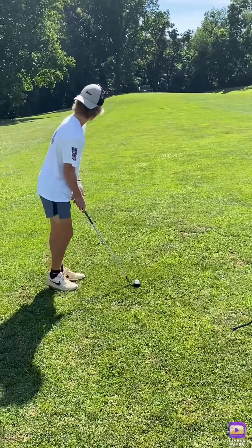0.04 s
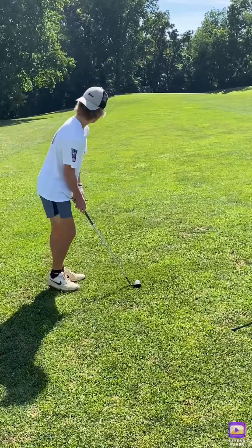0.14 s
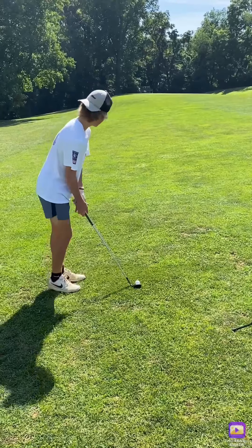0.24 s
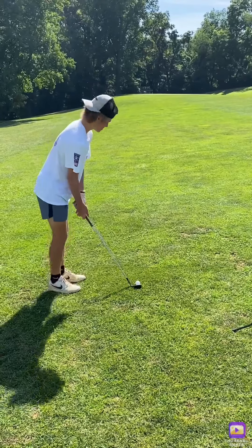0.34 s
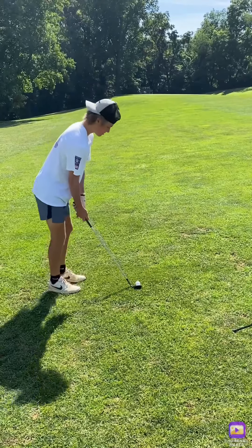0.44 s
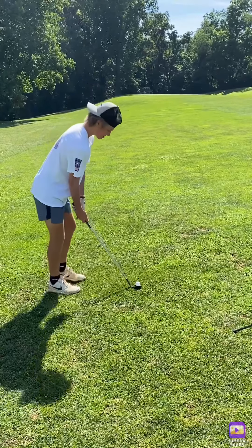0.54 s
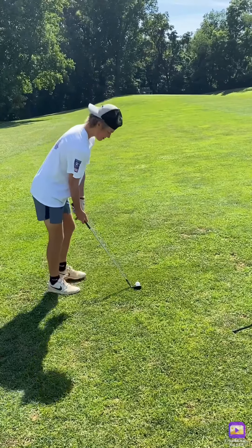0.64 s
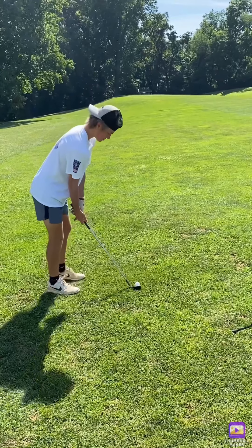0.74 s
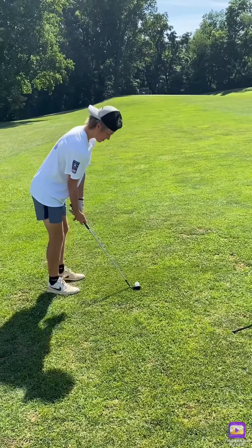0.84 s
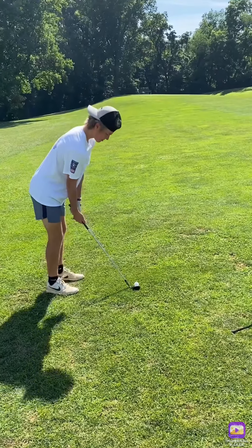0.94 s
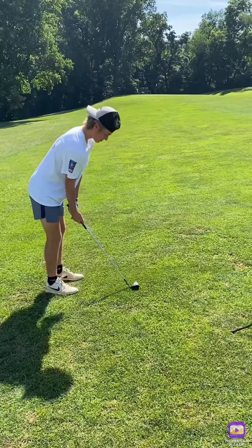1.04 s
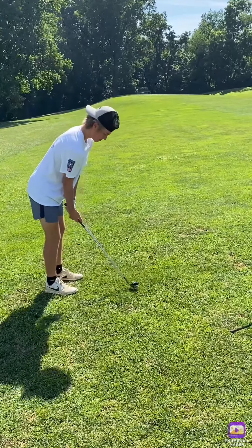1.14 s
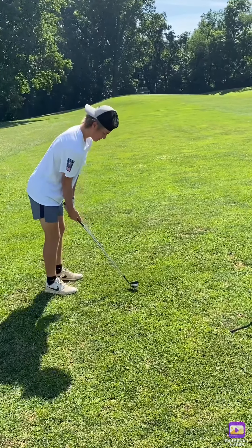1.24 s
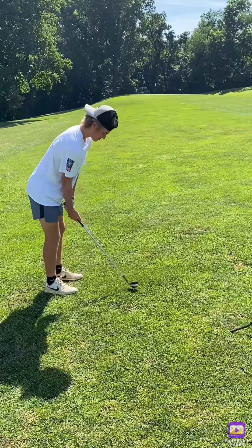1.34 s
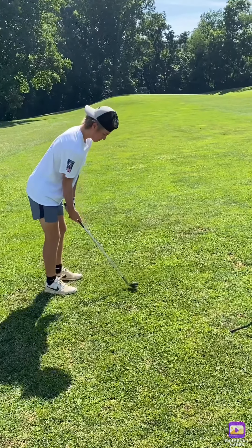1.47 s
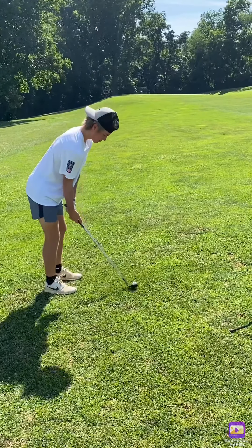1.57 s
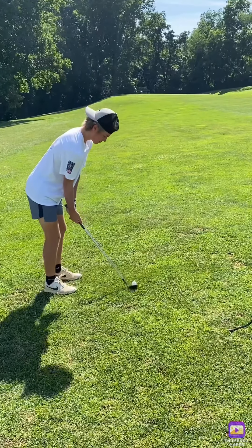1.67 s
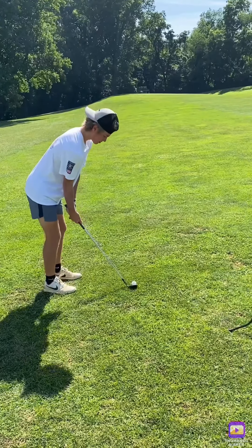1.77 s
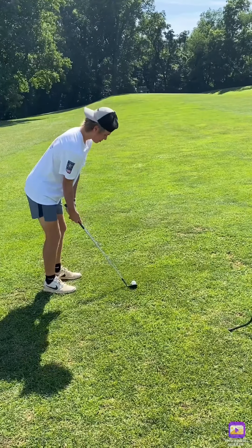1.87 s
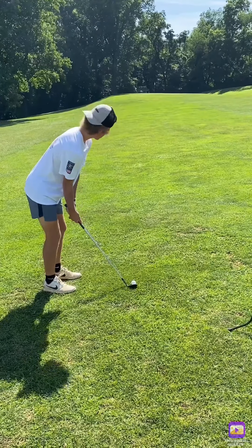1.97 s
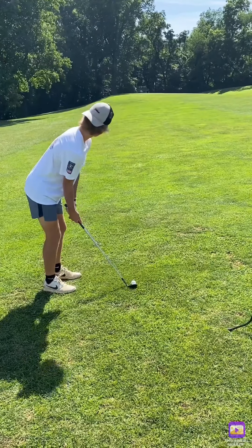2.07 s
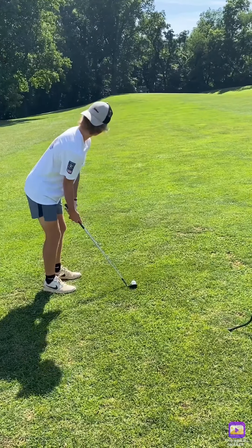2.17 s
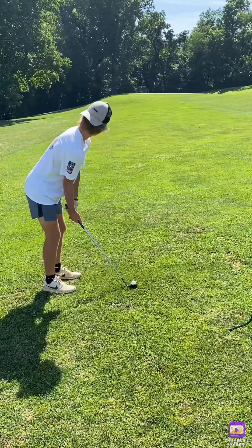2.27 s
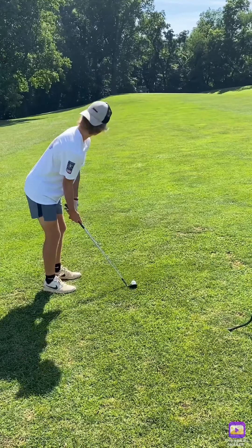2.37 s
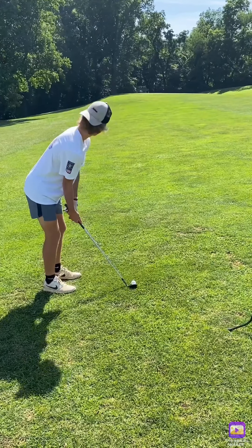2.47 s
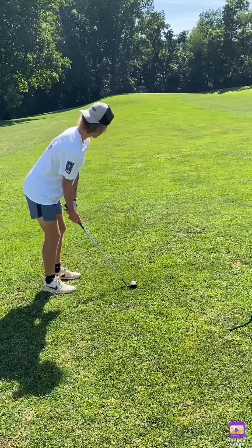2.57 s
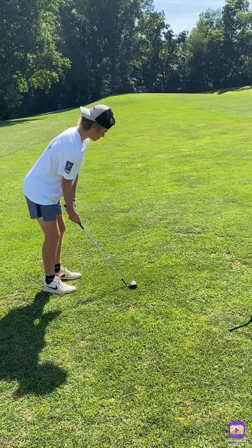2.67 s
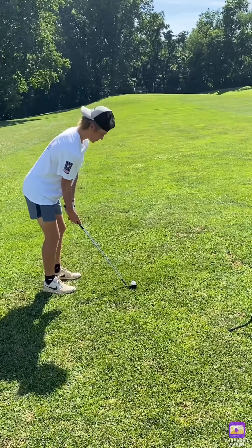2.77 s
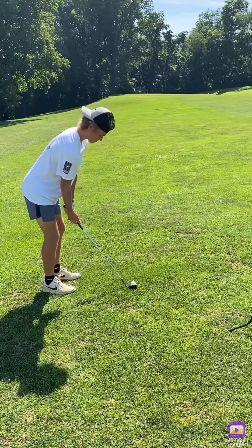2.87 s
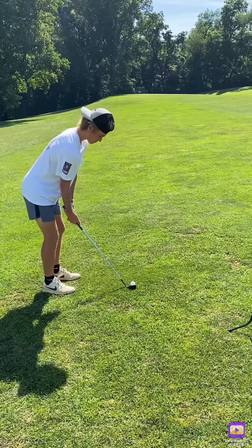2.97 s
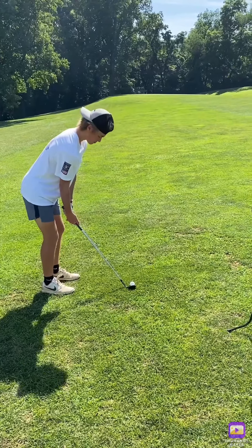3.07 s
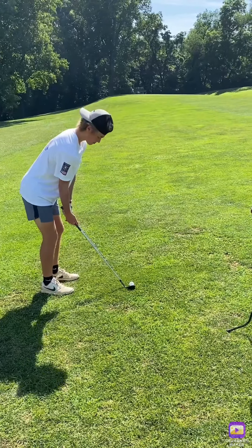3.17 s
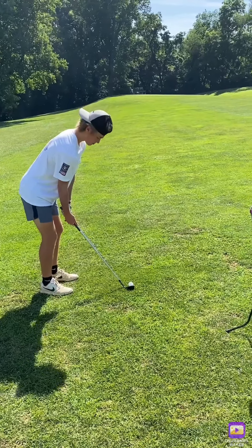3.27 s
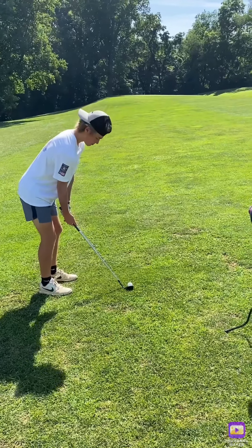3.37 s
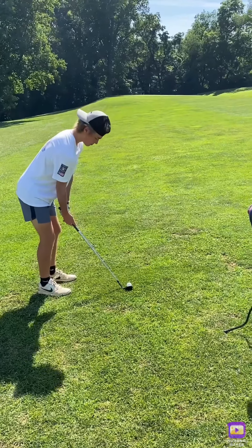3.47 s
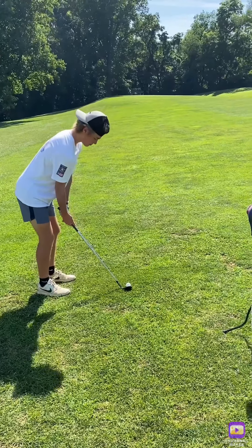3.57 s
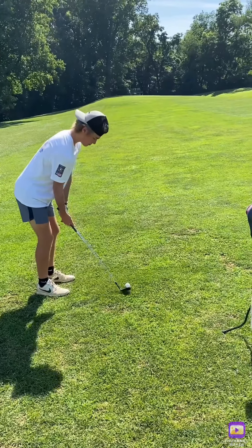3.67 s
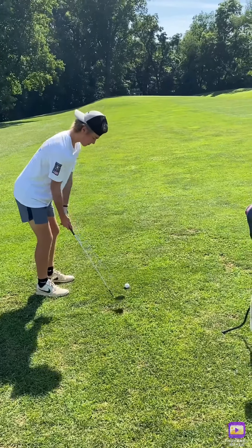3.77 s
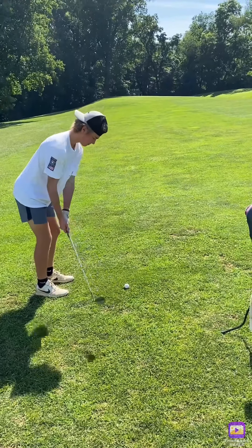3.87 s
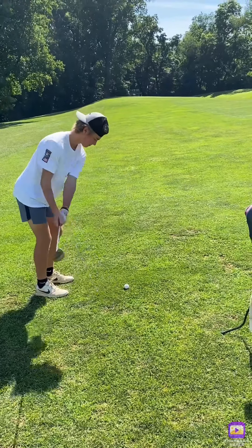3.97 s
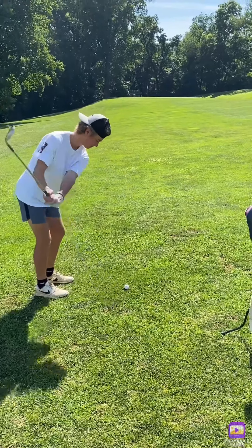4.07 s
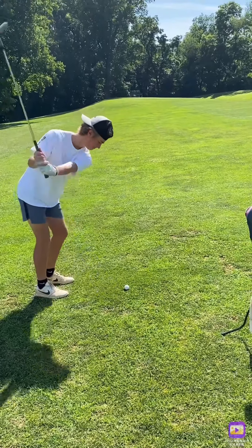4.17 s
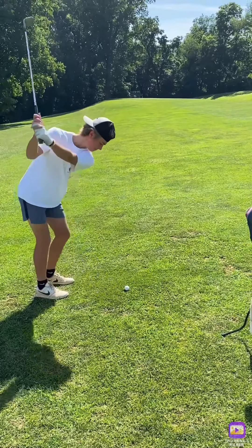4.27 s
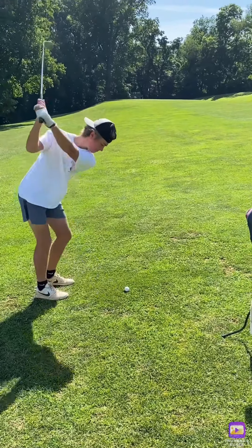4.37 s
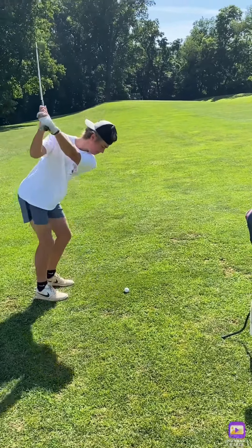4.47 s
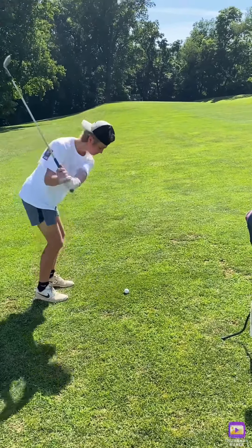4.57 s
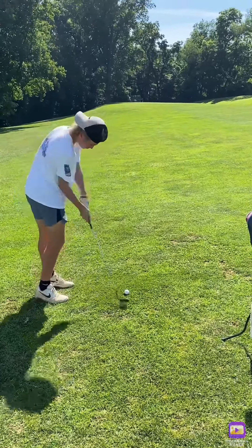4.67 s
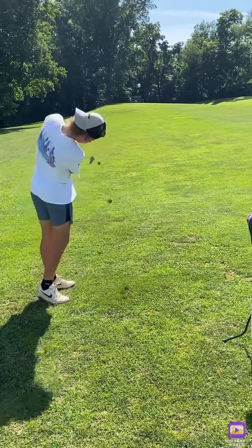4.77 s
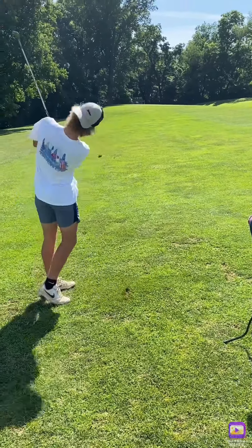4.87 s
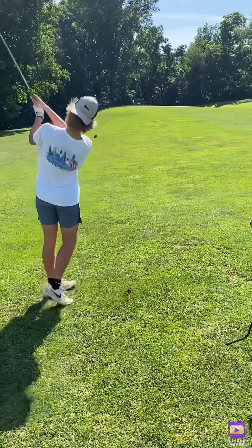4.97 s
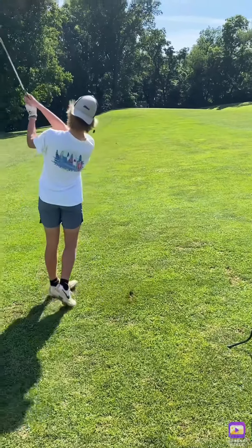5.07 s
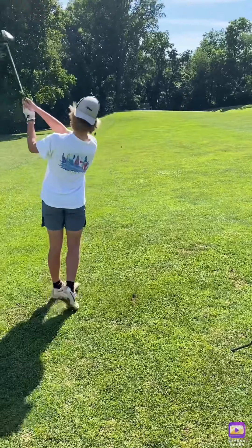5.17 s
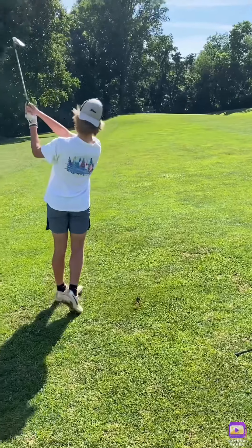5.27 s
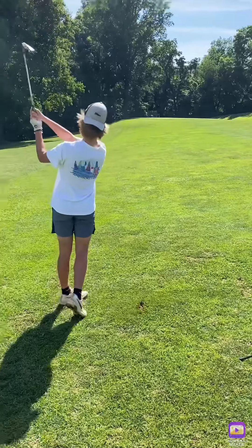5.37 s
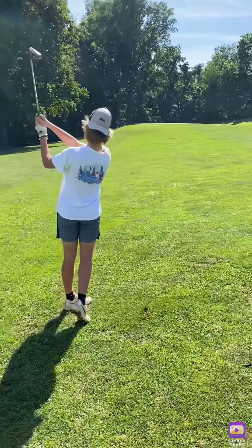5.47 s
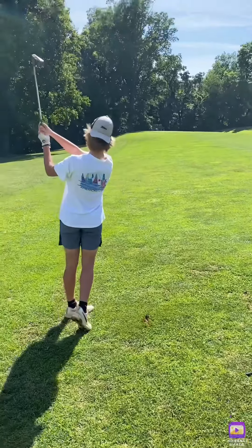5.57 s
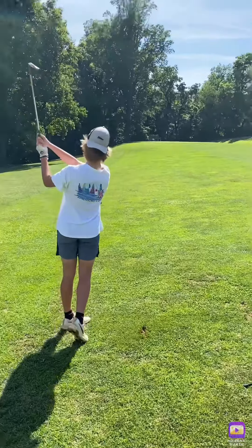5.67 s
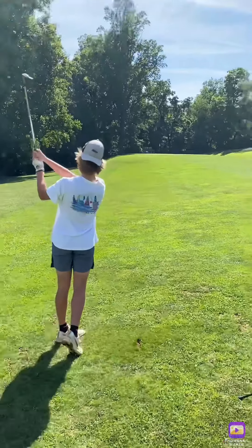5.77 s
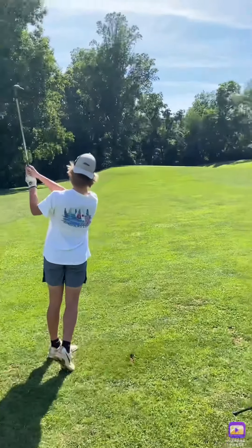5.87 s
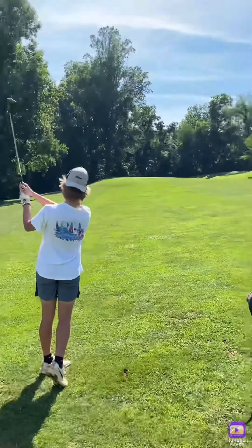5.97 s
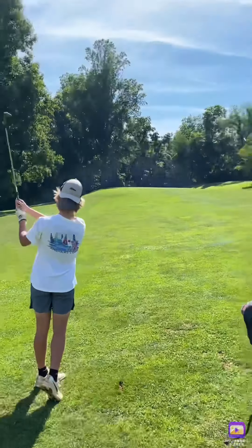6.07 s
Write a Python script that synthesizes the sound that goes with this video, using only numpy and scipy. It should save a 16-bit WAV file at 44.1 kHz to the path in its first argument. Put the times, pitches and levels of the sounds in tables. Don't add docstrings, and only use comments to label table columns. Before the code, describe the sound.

Low outdoor traffic rumble and engine drone continue steadily until one sharp, dry golf shot clicks close by, followed by a small patter of turf.

```python
import sys
import numpy as np
from scipy import signal
from scipy.fft import rfft, irfft, next_fast_len
from scipy.io import wavfile
from scipy.ndimage import uniform_filter1d, map_coordinates

SR = 44100
rng = np.random.default_rng(int(sys.argv[2]) if len(sys.argv) > 2 else 0)


def amplitude_ratio(level_db):
    exponent = np.asarray(level_db, float) / 20
    return 10 ** exponent


def persist_wave(psi):
    counts = np.round(np.clip(psi, -1, 1) * 32767).astype(np.int16)
    wavfile.write(sys.argv[1], SR, np.atleast_2d(counts).T)


N = 270485


def unit(x):
    return x / np.sqrt(np.mean(x ** 2) + 1e-20)


def along(points, hz):
    f, v = np.transpose(points)
    return np.interp(np.log(hz + 1), np.log(f + 1), v)


def curve(rows):
    s, value = np.transpose(rows)
    return np.interp(np.arange(N) / SR, s, value)


def burst(rows):
    s, db = np.transpose(rows)
    return amplitude_ratio(np.interp(np.arange(N) / SR, s, db, left=-200, right=-200))


def swell(s, db, rise_s, fall_s, hold_s=0):
    t = np.arange(N) / SR - s
    below = np.maximum(-t / rise_s, (t - hold_s) / fall_s)
    return amplitude_ratio(db - 20 * np.clip(below, 0, 10))


def passing(s, db, approach_s):
    t = np.arange(N) / SR - s
    leave_s = 2.5 * approach_s
    return db - 10 * np.log10(1 + (t / np.where(t < 0, approach_s, leave_s)) ** 2)


def wobble(rate_hz):
    knots = rng.standard_normal(int(N * rate_hz / SR) + 4)
    steps = np.arange(16 * len(knots)) / 16
    smooth = map_coordinates(knots, [steps])
    return np.interp(np.arange(N) * rate_hz / SR, steps, smooth)


def filtered(x, response):
    m = next_fast_len(N + SR // 4)
    spectrum = rfft(x, m) * response(np.fft.rfftfreq(m, 1 / SR))
    return irfft(spectrum, m)[..., :N]


def rush(spectrum, alike, patchy_db=0, grit_db=0):
    white = rng.standard_normal((2, N)) * amplitude_ratio(grit_db * wobble(340))
    z = signal.stft(white, nperseg=512)[2]
    field = rng.standard_normal(z.shape[1:])
    field = uniform_filter1d(uniform_filter1d(field, 6, 0), 14, 1)
    pair = signal.istft(z * amplitude_ratio(patchy_db * unit(field)), nperseg=512)[1][:, :N]

    def mid_side(hz):
        turn = np.arccos(np.clip(along(alike, hz), -1, 1)) / 2
        return amplitude_ratio(along(spectrum, hz)) * [np.cos(turn), np.sin(turn)]

    mid, side = filtered(pair, mid_side)
    return unit(np.array([mid + side, mid - side]))


def tone(hz, db, flutter_db):
    phase = 2 * np.pi * (np.cumsum(hz) / SR + rng.random()) + .15 * wobble(3)
    level = amplitude_ratio(db + flutter_db * wobble(2.5))
    return np.sqrt(2) * level * np.sin(phase)


# (frequency [Hz], likeness [0-1])
FAR_LIKENESS = [(60, 0.98), (250, 0.96), (600, 0.89), (1500, 0.91), (2500, .78), (4300, 0.47), (6000, 1),
                (9000, .93), (15000, 0.52)]
# (time [s], level [dB])
TRAFFIC_LEVEL = [(0, -34.5), (.84, -37.5), (1.14, -40.5), (2.82, -38), (3.64, -33.5), (4.54, -36),
                 (5.4, -34.5), (6.13, -45)]
# (frequency [Hz], density [dB per Hz])
RUMBLE_SPECTRUM = [(20, -50), (32, -3), (45, -2.5), (70, 10), (110, 4.5), (156, 3), (200, -3.5), (240, -10),
                   (300, -11.5), (450, -48.5), (900, -120)]


def rumble():
    level = amplitude_ratio(curve(TRAFFIC_LEVEL) - 3.5 + 0.57 * wobble(3.01))
    return level * rush(RUMBLE_SPECTRUM, FAR_LIKENESS, patchy_db=1.3)


# (time [s], level [dB])
RECEDE_LEVEL = [(0, 0), (1.5, 0), (3, -1.5), (3.7, -3), (5.4, -3), (6.13, -3)]
# (frequency [Hz], density [dB per Hz])
ROAR_SPECTRUM = [(165, -32), (330, -9.5), (480, -3.5), (640, -5.5), (850, 1.5), (1150, -5.5), (1700, -10),
                 (2400, -14.5), (3300, -23), (4600, -32.5), (6500, -40), (8500, -57), (12800, -61.5),
                 (14000, -78.5)]


def tyre_roar():
    level = amplitude_ratio(-44 + 0.34 * curve(RECEDE_LEVEL) + 0.5 * wobble(6))
    return level * rush(ROAR_SPECTRUM, FAR_LIKENESS, patchy_db=0.78)


# (nearest [s], level [dB], approach [s])
CAR_PASSES = [
    (3.65, -53, .2),
    (4.9, -50.5, .3),
]
# (frequency [Hz], density [dB per Hz])
CAR_SPECTRUM = [(200, -120), (290, -31), (370, -6), (430, -1.5), (520, -1.5), (650, -30.5), (1000, -120)]


def car_hum():
    level = sum(amplitude_ratio(passing(*row) - 4.5) for row in CAR_PASSES)
    return level * rush(CAR_SPECTRUM, FAR_LIKENESS, patchy_db=1.5)


# (nearest [s], pitch [Hz], slide [Hz per s], level [dB rms], approach [s])
EXHAUST_NOTES = [
    (2.1, 82.6, -1.8, -39, 0.4),
    (5.4, 56.9, 0.93, -44, 1.3),
    (4.6, 53.8, .5, -42.5, 1.3),
    (5.66, 387, 25, -52.5, .03),
]


def exhausts():
    t = np.arange(N) / SR
    return sum(tone(hz + slide * (t - s), passing(s, db, approach_s), flutter_db=2.0)
               for s, hz, slide, db, approach_s in EXHAUST_NOTES)


# (shaft [Hz], drift [Hz per s], level [dB], share of receding [ratio])
MOWER_ENGINES = [
    (20.264, 0.0251, 1, .9),
    (21.37, .003, -1.5, 1.5),
]
# (multiple of shaft [ratio], level [dB rms])
FIRST_ORDERS = [(4, -54), (5, -47), (6, -52.5), (7, -45.5), (8, -65), (9, -46.5), (10, -52), (11, -54.5),
                (12, -55), (13, -60.5), (14, -58), (16, -63.5), (19, -69.5), (21, -63.5)]
SECOND_ORDERS = [(2, -53.5), (4, -47), (5, -48), (6, -56.5), (7, -40.5), (8, -54), (9, -46), (10, -60.5),
                 (12, -62), (13, -63), (14, -62.5)]


def mower(engine, orders):
    shaft_hz, drift, db, share = engine
    hz = shaft_hz + drift * np.arange(N) / SR
    db = db + share * curve(RECEDE_LEVEL)
    return sum(tone(k * hz, db + order_db, flutter_db=0.48) for k, order_db in orders)


def mower_pops():
    firing_hz, ring_hz, ring_spread, rise_s = 20.21, 950, .12, .0012
    out, t = 0, np.arange(N) / SR
    for turn, db in ((.81, 0), (.37, -5)):
        turns = firing_hz * t + 1 - turn
        scatter = rng.standard_normal((int(turns[-1]) + 1, 2))
        size, pitch = scatter[turns.astype(int)].T
        age_s = turns % 1 / firing_hz
        envelope = age_s / rise_s * np.exp(1 - age_s / rise_s)
        ring = np.sin(2 * np.pi * ring_hz * (1 + ring_spread * pitch) * age_s)
        out = out + amplitude_ratio(db + 2 * size) * envelope * ring
    out = out * amplitude_ratio(passing(.35, -37, approach_s=.5))
    return filtered(out, lambda hz: np.exp(-(hz / 2600) ** 2))


# (time [s], length [s], start [Hz], end [Hz], level [dB])
BIRD_CHIPS = [
    (0.425, .012, 4650, 4400, -65),
    (0.907, 0.033, 5650, 5000, -67),
    (2.193, .03, 5650, 4750, -70),
    (2.332, .026, 5060, 5050, -65),
    (2.346, .016, 5050, 4650, -67),
    (2.355, .045, 5050, 5030, -71),
    (2.418, .04, 5050, 5050, -75),
]


def bird():
    out = np.zeros(N)
    for s, length_s, start_hz, end_hz, db in BIRD_CHIPS:
        u = np.linspace(0, 1, round(length_s * SR))
        hz = start_hz + (end_hz - start_hz) * u
        whistle = np.sin(2 * np.pi * np.cumsum(hz) / SR)
        out[round(s * SR):][:len(u)] += amplitude_ratio(db) * np.sin(np.pi * u) * whistle
    return out


# (frequency [Hz], likeness [0-1])
NEAR_LIKENESS = [(500, 0.9), (5000, 1), (15000, .93)]
# (frequency [Hz], density [dB per Hz])
CLOTH_SPECTRUM = [(1750, -27.5), (3500, -1), (5000, 0.5), (7000, -4), (9000, -3.5), (11000, -5.5),
                  (13000, -6.5), (15500, -12)]
# (time [s], level [dB], 20 dB rise [s], 20 dB fall [s])
CLOTH_MOVES = [(.05, -86, 0.18, .3), (.222, -88, 0.093, .08), (.45, -90.5, .1, .4), (.688, -92.5, .03, .15),
               (.805, -90, 0.027, .08), (4.24, -82.5, 0.37, .35), (4.35, -83, .15, .07),
               (4.586, -76, 0.15, .15), (4.685, -64.5, .06, .02), (4.755, -68, .03, .1),
               (4.795, -70, 0.048, .1), (4.9, -78, .07, .04), (4.95, -74.5, .06, 0.067),
               (5.03, -82.5, .1, 0.11), (5.1, -82, .1, .2), (5.392, -89, .1, .04)]


def rustle():
    level = amplitude_ratio(7.5) * sum(swell(*row) for row in CLOTH_MOVES)
    return level * rush(CLOTH_SPECTRUM, NEAR_LIKENESS, grit_db=-1.5)


# (time [s], peak [dB])
GRASS_TICKS = [
    (0.8012, -60),
    (4.9032, -55.5),
    (4.9701, -71),
    (5.0394, -71),
    (5.0994, -67.5),
    (5.2194, -72),
    (5.3981, -78),
    (5.5391, -79),
    (5.6194, -85),
]


def ticks():
    gate = sum(burst([(s - .0005, db - 8), (s, db + 4), (s + .002, db - 14)]) for s, db in GRASS_TICKS)
    return gate * rush(CLOTH_SPECTRUM, NEAR_LIKENESS)


# (frequency [Hz], density [dB per Hz])
SHAFT_SPECTRUM = [(500, -120), (1200, -25.5), (2000, -3), (3500, 3.5), (6000, -10.5), (8000, -14),
                  (14000, -39.5)]


def swish():
    fastest_s, fade_20db_s = 4.705, 0.088
    off = (np.arange(N) / SR - fastest_s) / fade_20db_s
    return amplitude_ratio(-56.5 - 20 * off ** 2) * rush(SHAFT_SPECTRUM, NEAR_LIKENESS)


# (time [s], level [dB], 20 dB rise [s], 20 dB fall [s])
DIVOT_LANDINGS = [
    (5.763, -55.5, .001, .04),
    (5.787, -64, .02, .03),
    (5.81, -67, .03, .01),
    (5.828, -64, .008, .01),
]
# (frequency [Hz], density [dB per Hz])
CRUMB_SPECTRUM = [(1750, -30.0), (3500, -7), (6300, -8), (7800, -30), (9000, -24), (11000, -17),
                  (13000, -25), (15500, -22.5)]


def divot():
    level = sum(swell(*row) for row in DIVOT_LANDINGS)
    return level * rush(CRUMB_SPECTRUM, NEAR_LIKENESS, grit_db=3)


# (frequency [Hz], density [dB per Hz])
TURF_SPECTRUM = [(300, -30.5), (560, -1), (1050, -10.5), (1600, -1), (2300, -5.5), (3300, -1.5),
                 (4200, -27.5), (5000, -9), (6500, -6.5), (8500, -9.5), (10000, -9.5), (13000, -15),
                 (15500, -18)]


def plough():
    dig = swell(4.7095, -27, .0031, .0031, hold_s=.009)
    bite = swell(4.7128, -18.5, .005, .005)
    return (dig + bite) * rush(TURF_SPECTRUM, NEAR_LIKENESS, grit_db=-0.5)


# (time [s], level [dB rms])
SNAP_TIMES = [
    (4.7111, -13),
    (4.7124, -12),
    (4.7131, -13),
    (4.7146, -24),
]
# (frequency [Hz], density [dB per Hz])
SNAP_SPECTRUM = [(2000, -19), (3300, -4), (4300, -14), (5200, 0.5), (7300, -13), (10000, 0.5), (13000, -6),
                 (15500, -13.5)]


def snaps():
    gate = sum(burst([(s - .0001, db), (s + .0006, db - 18)]) for s, db in SNAP_TIMES)
    return gate * rush(SNAP_SPECTRUM, NEAR_LIKENESS)


def soil(t):
    open_s, first_push_s, stretch, t60_s = 4.7115, .0019, 1.8, 0.072
    age = np.clip(t - open_s, 1e-5, None) / first_push_s
    cycles = np.log(age) / np.log(stretch)
    level = amplitude_ratio(-15.5 - 60 * age * first_push_s / t60_s) * np.minimum(age, 1) ** 2
    return level * np.cos(2 * np.pi * cycles)


STRIKE_S = 4.7119


def squash(t):
    contact_s = .0023
    contact = np.clip((t - STRIKE_S) / contact_s, 0, 1)
    cycles = contact_s * contact * (2950 - 950 * contact)
    return amplitude_ratio(-9.5) * np.sin(np.pi * contact) * np.cos(2 * np.pi * (cycles - .52))


# (frequency [Hz], level [dB], t60 [s])
BLADE_MODES = [(1560, -20, .014), (3250, -13, .014), (4950, -18, .012), (9900, -19, .01),
               (15400, -27, .012)]


def blade(t):
    age_s = np.clip(t - STRIKE_S - .0003, 0, None)
    return sum(amplitude_ratio(db - 60 * age_s / t60_s) * np.sin(2 * np.pi * hz * age_s)
               for hz, db, t60_s in BLADE_MODES)


def strike():
    first = round((STRIKE_S - .03) * SR)
    t = (first + np.arange(SR // 10)) / SR
    blow = squash(t) + blade(t) + soil(t)
    return np.pad(blow, (first, N - first - len(t))) + snaps() + plough()


def scene():
    road = rumble() + tyre_roar() + car_hum() + exhausts()
    engines = sum(map(mower, MOWER_ENGINES, (FIRST_ORDERS, SECOND_ORDERS)))
    far = road * amplitude_ratio([[-.1], [.1]]) + engines * amplitude_ratio([[-.4], [.4]]) + mower_pops() + bird()
    golfer = rustle() + ticks() + swish() + divot()
    return far + golfer + strike()


def roll_off(x):
    return signal.sosfilt(signal.butter(12, 16670, fs=SR, output="sos"), x)


# (frequency [Hz], left lead [rad])
PORT_LEAD = [(0, 0), (1600, .03), (2250, .4), (2900, 1.7), (3500, .65), (4300, .9), (4950, .25),
             (7300, 3.14)]


def record(dry):
    def ports(hz):
        delay = 2 * np.pi * .000163 * np.clip(hz - PORT_LEAD[-1][0], 0, None)
        lead = np.interp(hz, *np.transpose(PORT_LEAD)) + delay
        limit = amplitude_ratio(-np.clip(hz - 15750, 0, None) / 25)
        return np.exp(.5j * lead * np.array([[1], [-1]])) * limit

    mix = filtered(dry, ports)
    return roll_off(mix)


dry = scene()
out = record(dry)
persist_wave(out)
```